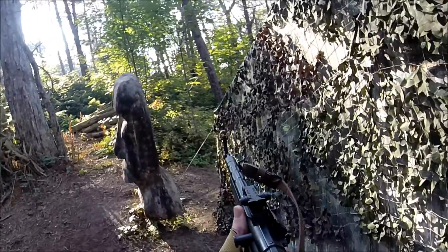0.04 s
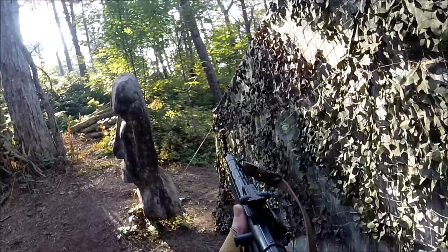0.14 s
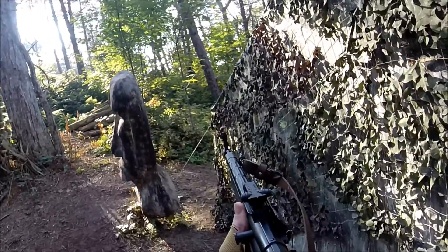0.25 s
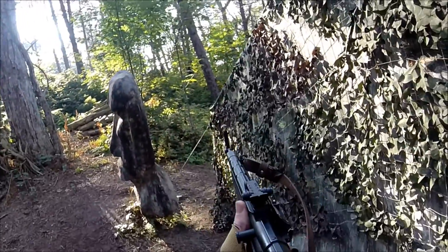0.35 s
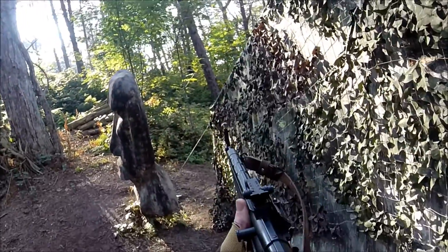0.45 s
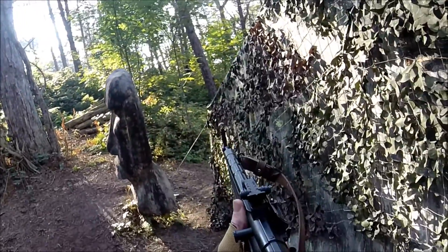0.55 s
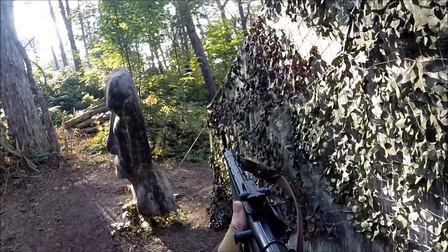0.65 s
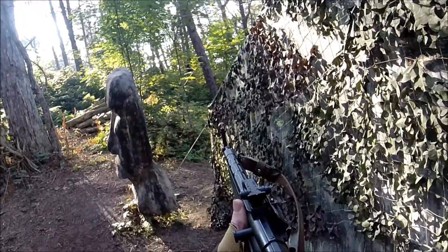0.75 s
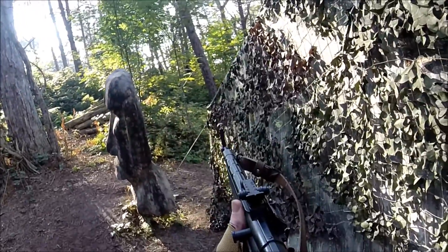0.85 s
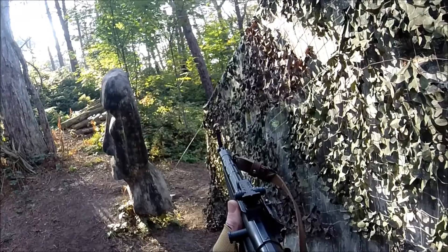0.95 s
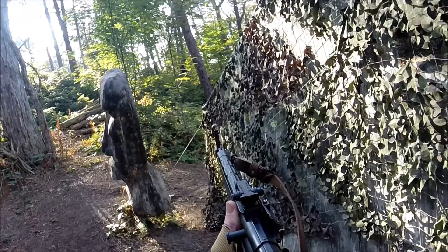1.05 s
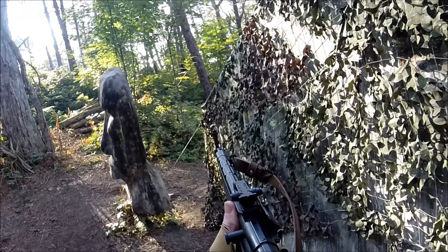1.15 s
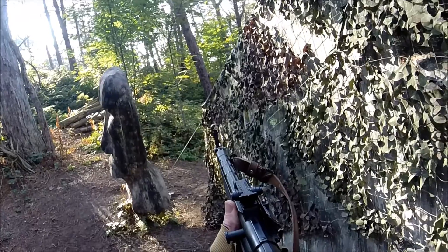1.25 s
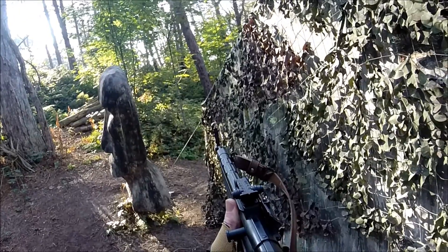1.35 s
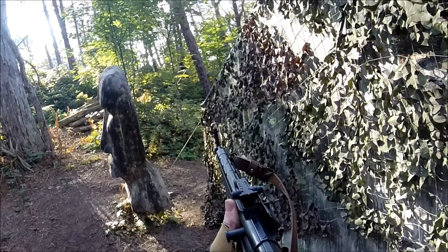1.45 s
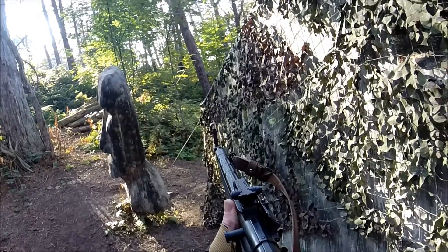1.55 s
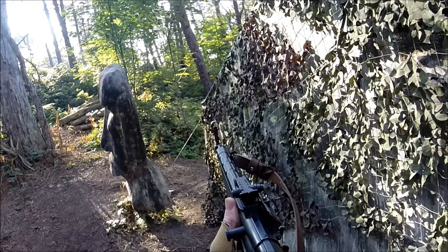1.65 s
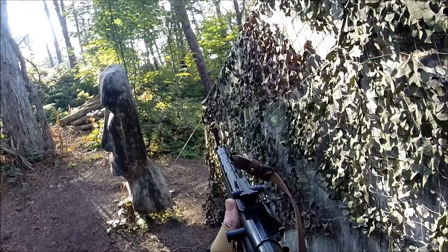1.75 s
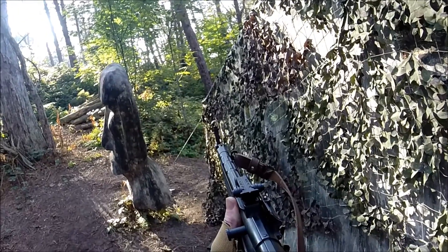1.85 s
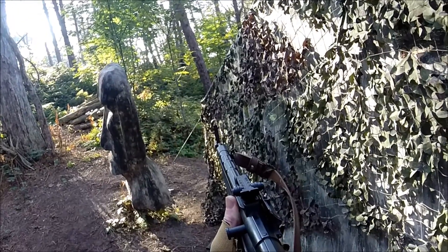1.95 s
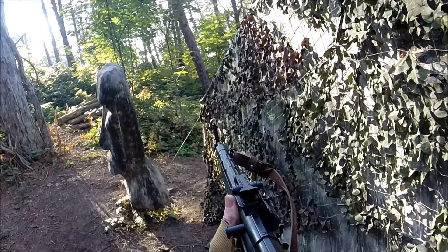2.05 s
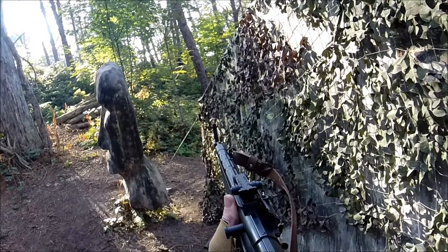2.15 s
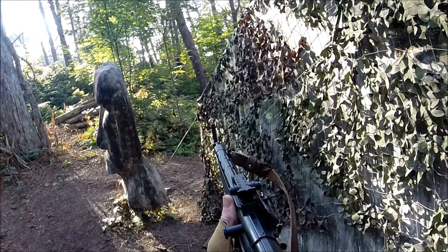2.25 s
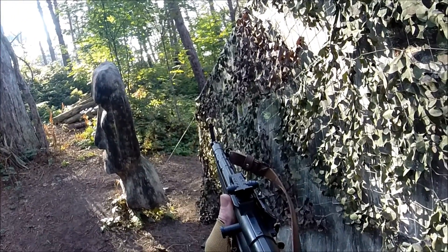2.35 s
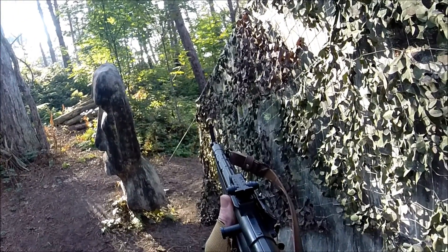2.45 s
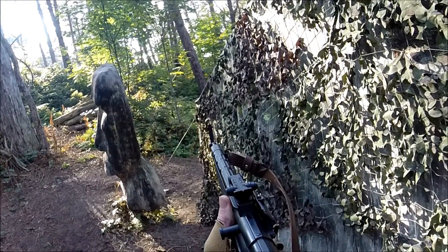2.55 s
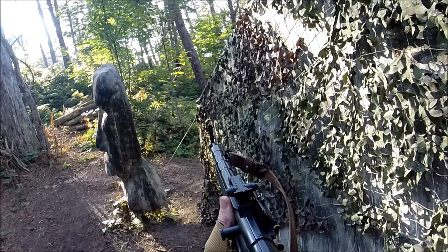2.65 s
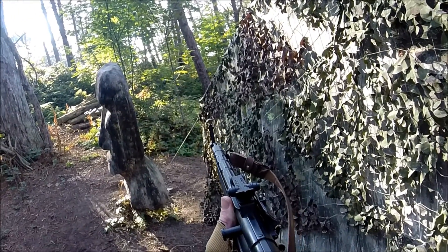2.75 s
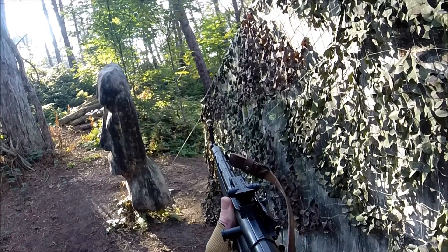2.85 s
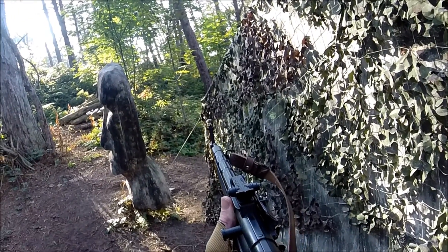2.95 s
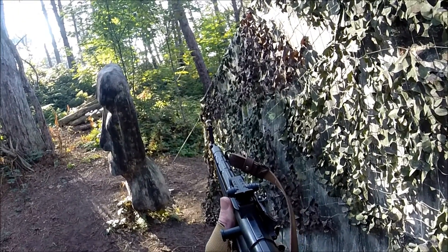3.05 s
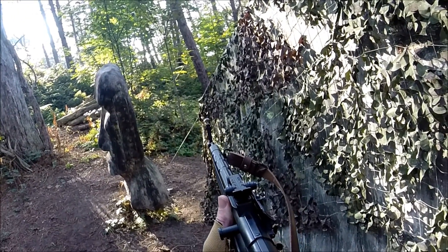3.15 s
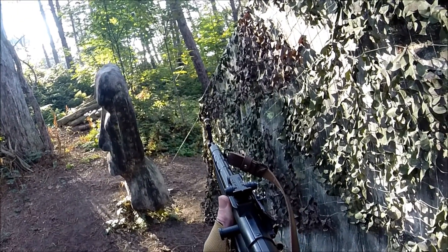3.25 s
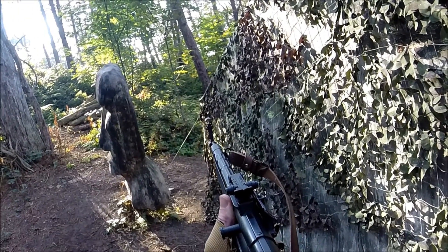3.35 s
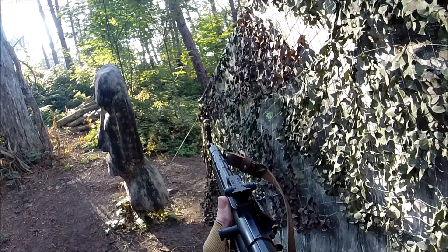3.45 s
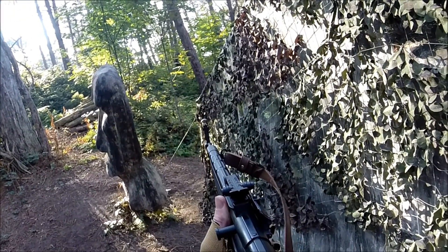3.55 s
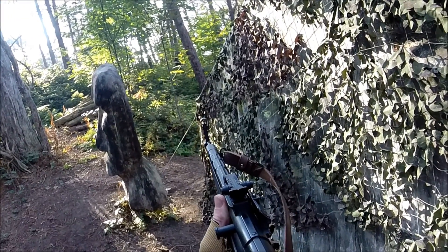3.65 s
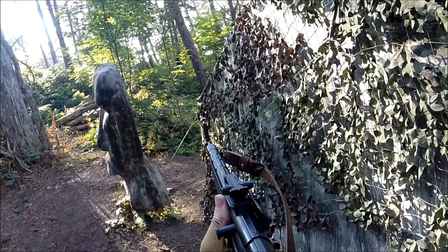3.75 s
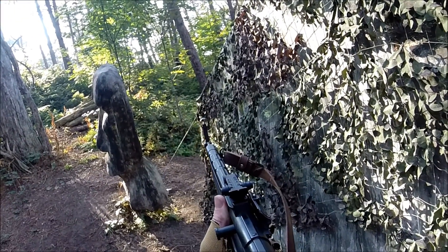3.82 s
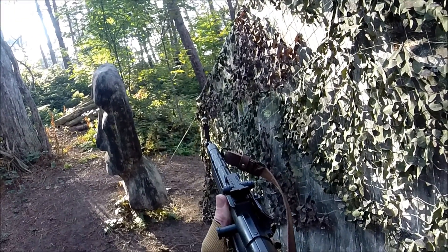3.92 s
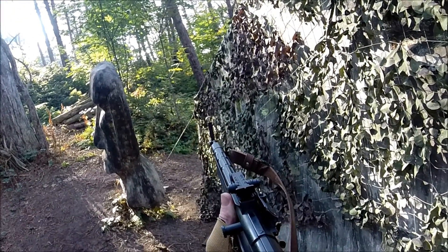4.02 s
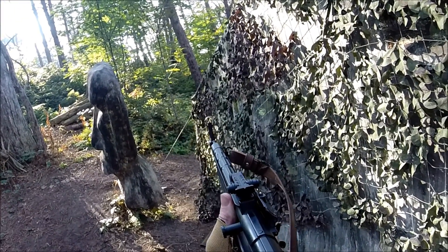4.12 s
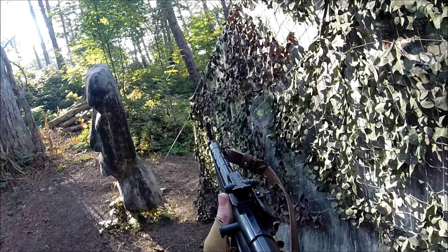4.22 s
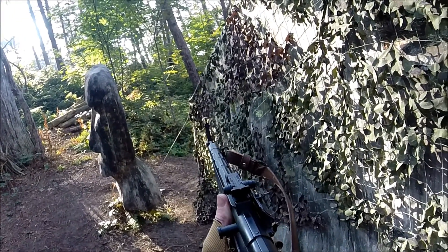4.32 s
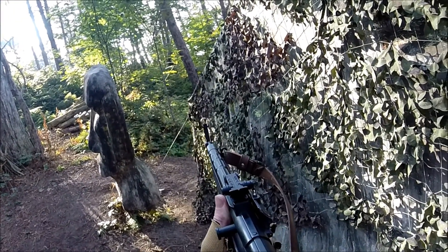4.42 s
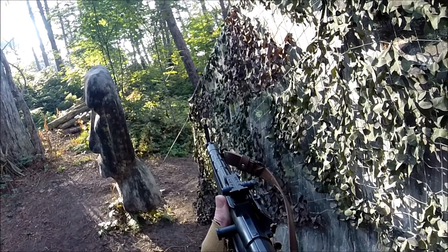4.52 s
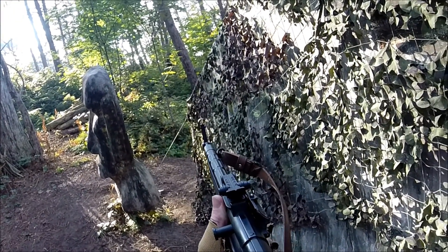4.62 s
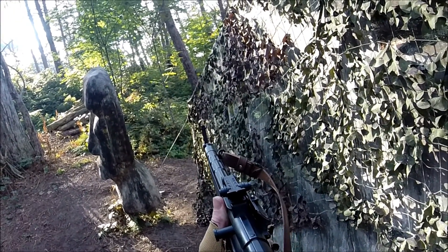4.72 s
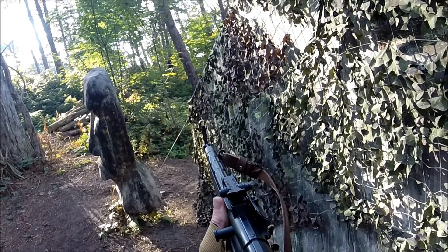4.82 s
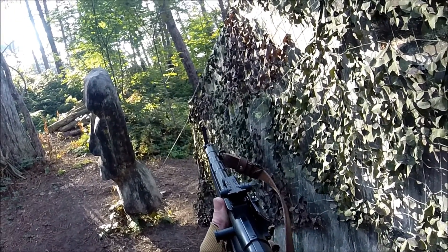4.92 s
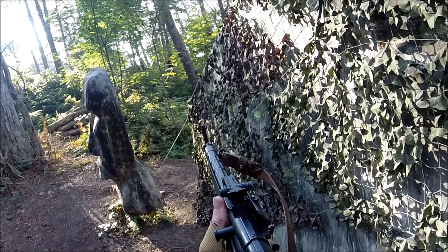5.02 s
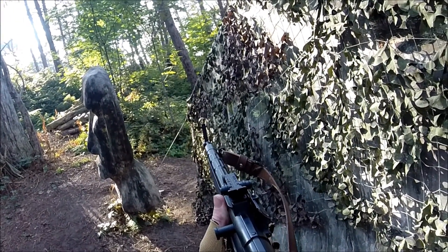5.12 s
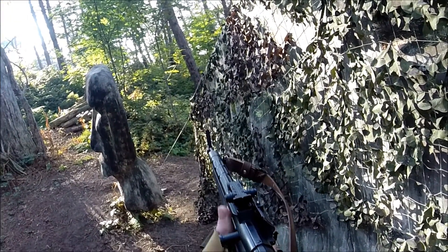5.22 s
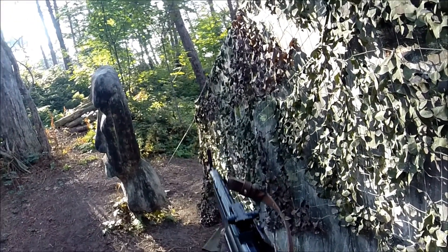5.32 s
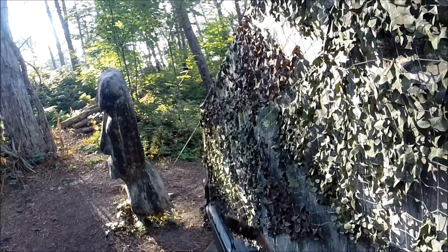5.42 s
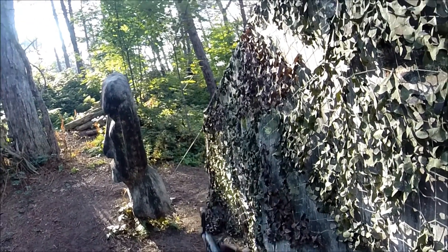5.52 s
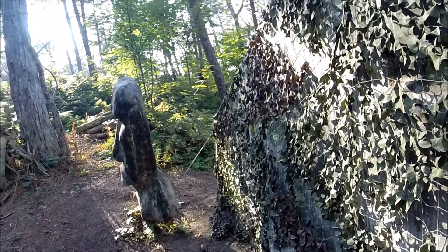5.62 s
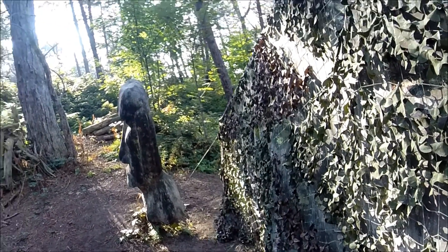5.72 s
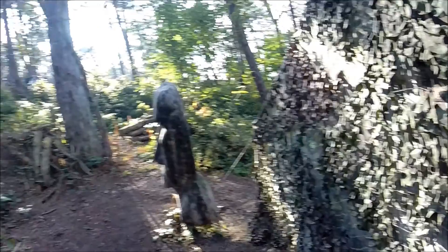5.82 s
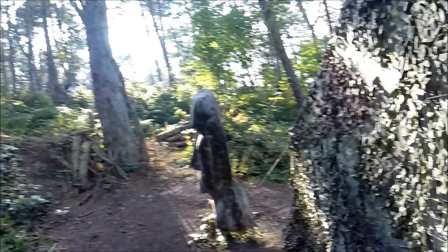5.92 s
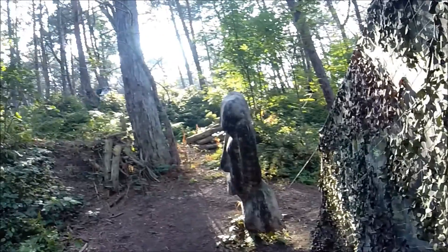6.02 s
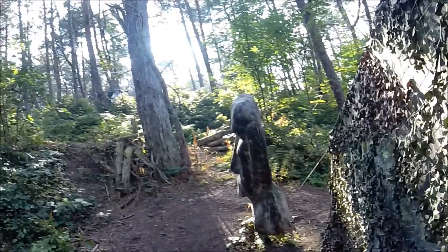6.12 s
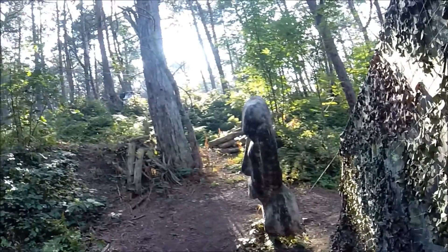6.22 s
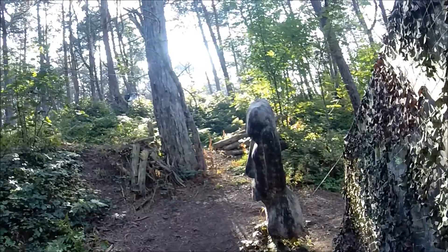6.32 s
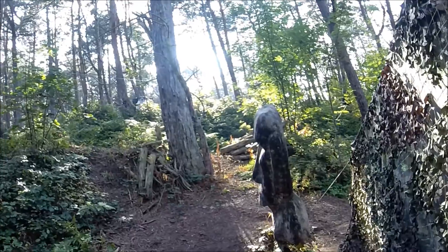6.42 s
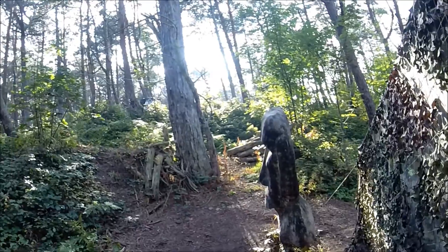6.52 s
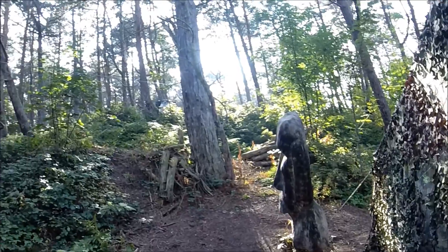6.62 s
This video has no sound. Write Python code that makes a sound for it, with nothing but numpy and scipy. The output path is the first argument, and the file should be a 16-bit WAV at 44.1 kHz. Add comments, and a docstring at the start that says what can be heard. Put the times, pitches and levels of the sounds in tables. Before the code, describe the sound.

An electric spring-piston toy rifle fires one long rapid burst, then two shorter ones, in quiet woodland, followed by loose handling knocks.

```python
"""Woodland air and a rustle of cloth are heard first, as filtered noise, then an electric spring-piston toy rifle
fires three bursts among trees. Gears grind the piston back, as random tooth contacts and a harmonic whine.
They let it go with a rattle and a thump; the air pops from the barrel, the tube rings and the gear catches
the piston again, impulses exciting damped resonators. Afterwards the gun and its strap knock about."""
import sys
import numpy as np
from scipy import signal
from scipy.fft import rfft, irfft
from scipy.io import wavfile

SR = 44100
rng = np.random.default_rng(int(sys.argv[2]) if len(sys.argv) > 2 else 0)


def to_wav(s):
    """Save 16-bit WAV."""
    ch = np.atleast_2d(s).T  # columns
    pcm = np.round(np.clip(ch, -1, 1) * 32767)  # PCM
    wavfile.write(sys.argv[1], SR, pcm.astype(np.int16))


def volts_from_db(level):
    """Convert decibel levels to linear amplitude ratios."""
    exponent = np.asarray(level, float) / 20
    return 10 ** exponent


N = 294069

# woodland air and cloth rustle: (time [s], air level [dB], rustle level [dB])
AIR_AND_RUSTLE = [(0, -49.5, -49.5), (.16, -52, -50), (2.8, -54.5, -57), (4.2, -55.5, -56), (4.9, -62, -58),
                  (5.3, -67, -57), (5.55, -64, -60.5), (5.8, -57, -54.5), (6.0, -56.5, -57),
                  (6.1, -53, -51), (6.3, -50, -48.5), (6.5, -52, -52.5), (6.58, -54, -39.5),
                  (6.67, -50, -56)]
# spectral shape of the air noise: (frequency [Hz], relative density [dB])
AIR_COLOUR = [(15, -27), (25, -4), (53, -3), (163, -12.5), (363, -13), (621, -17), (952, -36.5),
              (1810, -51), (3350, -78), (6540, -66), (15000, -73)]
# spectral shape of the rustle noise: (frequency [Hz], relative density [dB])
RUSTLE_COLOUR = [(200, -60), (440, -6), (1000, -3.3), (1400, -7), (1900, -11.5), (2200, -16), (2700, -16),
                 (3350, -8.5), (4000, -17), (5000, -16.5), (6400, -16.5), (8200, -26), (10500, -30),
                 (15000, -61)]
# gun and strap knocks: (time [s], level [dB], treble against it [dB], decay time T60 of the shaking [s])
KNOCKS = [(5.476, -47.5, -10, .06), (5.734, -33, 0.5, 0.037), (5.888, -27.5, -31, .076),
          (5.913, -30, -25, 0.043), (5.99, -47, -2, 0.053), (6.008, -32.5, -37, .045),
          (6.082, -46, -12.5, 0.054), (6.146, -29, -12, 0.075), (6.155, -23, -36, 0.036),
          (6.186, -23.5, -34, 0.049), (6.199, -34, -16, 0.06), (6.282, -44, 1.5, .047),
          (6.361, -26.5, -6.5, .11), (6.404, -24, -16, 0.046), (6.522, -20.5, -7.5, 0.078),
          (6.565, -35, 0.5, 0.2), (6.612, -22.5, -22, 0.028)]
# gun body resonances: (frequency [Hz], width [Hz], level when ground [dB], on release [dB], on the slam [dB])
BODY_MODES = [(308, 140, -51, -3, -9), (553, 285, -14, 0.5, -17), (763, 44, 1, 4.5, -15),
              (903, 145, -1.43, -17, -17), (1150, 273, -5, -2.5, -3.5), (1485, 206, -12, -8, -11.5),
              (2136, 199, -15, -6, 0.5), (3025, 465, -14.5, -5.5, -2), (3413, 405, -10.5, -11, -0.5),
              (4360, 244, -13, -9, 2), (5435, 900, -17.5, -12.5, -5.5), (6450, 990, -15.5, -8.5, -5.5),
              (7690, 1460, -25, -24.5, -9.5), (10250, 700, -30, -30, -18), (12600, 800, -36, -38, -30)]
# gear latch at start and stop: (time [s], rattle level [dB])
LATCH = [(0.166, -10), (2.781, -4), (2.801, -17), (2.814, -27), (3.082, -29), (4.099, -15.5), (4.299, -32)]
# trigger pulls: (time [s], strain against the resting spring [dB], top speed [turns/s], time to reach it [ms])
PULLS = [(.165, 8.5, 294, 68), (3.082, 2.5, 258, 32), (4.294, 7, 308, 66)]
# course of the strain: (time after the pull [ms], share of the strain [1])
STRAIN = [(0, .1), (19, -.5), (30, .9), (66, .65), (85, .3), (120, .3)]
# motor stops: (power off [s], gears halt [s], level lost by the halt [dB])
STOPS = [(2.736, 2.761, 17), (4.009, 4.112, 12.5), (5.286, 5.325, 6)]
# load through one gear turn: (time after the pop [ms], grinding level [dB])
TURN_LOAD = [(0, 14), (14, 0.5), (22, -4), (28, -2.5), (45, 3), (62, 1.2), (80, 2), (95, 3.5), (130, 14.5)]
# motor and gear whine: (multiple of the motor speed [1], relative level [dB])
WHINE = [(2, -3), (3, -4), (4, -8), (5, -14), (6, -1), (8, -3), (10, -8)]
# shots with a pellet: (time [s], pop level [dB], force of the piston stroke [dB])
PELLET_SHOTS = [(.2666, -1.2, -19), (.3718, -3.5, -21), (.4732, -4.4, -20.5), (.5744, -3.8, -19.5),
                (.676, -3.6, -19.7), (.7781, -4.1, -19.7), (.8816, -3.1, -19.2), (.9855, -3.2, -21.4),
                (1.089, -3.7, -21.5), (1.1929, -5, -22.1), (1.2968, -5, -21.4), (1.4016, -3.5, -20.3),
                (1.506, -4.8, -19.9), (1.6105, -4.1, -20.6), (1.7154, -3.3, -19.9), (1.82, -3.6, -19.6),
                (1.925, -3, -19), (2.0288, -8.4, -23.6), (2.1352, -6.6, -23.6), (2.2408, -5.3, -21.9),
                (2.3466, -4.5, -20.9), (2.4526, -4.5, -20.3), (2.5585, -4.2, -20.4), (2.6649, -3.7, -19.7),
                (3.1486, -2.2, -18.7), (3.2623, -3.9, -18.2), (3.3689, -3.9, -19.8), (3.4754, -3.8, -20.4),
                (3.5819, -4.4, -20.4), (3.6886, -4.3, -20.4), (3.7954, -3.7, -20.1), (3.9021, -3.5, -20.3),
                (4.009, -3.6, -20.3), (4.414, -2.7, -15.2), (4.5244, -3.3, -20.2), (4.6316, -4.1, -20.3),
                (4.7386, -3.9, -20.4), (4.8461, -4.3, -21), (5.1712, -11.9, -28.7)]
# shots from an empty barrel: (time [s], pop level [dB], force of the piston stroke [dB])
EMPTY_SHOTS = [(4.9509, -2.4, -26.9), (5.0599, -4, -26), (5.2823, -3.3, -28)]
# air in barrel and cylinder, with a pellet: (frequency [Hz], level [dB], T60 [s], delay after the shot time [ms])
LOADED_TUBE = [(838, -6.5, .05, 4.25), (419, -19, .035, 3.95), (1250, -8, .014, 1.25)]
# air in barrel and cylinder, empty: (frequency [Hz], level [dB], T60 [s], delay after the shot time [ms])
EMPTY_TUBE = [(1010, -1, 0.023, 2.92), (781, -9.5, 0.017, 5.56), (330, -7.5, 0.021, 0.86)]

TREES_T60_S, TREES_DB = .053, -20.5
KNOCK_HZ, KNOCK_SPREAD = 1080, .055   # hollow ring of the shell, a little different wherever it is struck
KNOCK_OVERTONE, KNOCK_OVERTONE_DB = 1.84, -7   # second ring of the shell (multiple of the first), shorter
KNOCK_LOW_DB, KNOCK_HIGH_DB, KNOCK_RING_DB, KNOCK_TICK_DB = 9.5, 15.5, -2.5, 9   # shares of each knock
JOLT_DB, JOLT_T60_S = -15, .04   # the motor jerks the gears into mesh at each pull

# grinding swells and sinks with the force of the strokes
GRIND_DB, USUAL_FORCE_DB, GRIND_FOLLOWS, FORCE_MOST_DB = -29.5, -18.5, .98, -.5
# freed by the shot the motor speeds up, then the tightening spring slows it (turns per second)
SHOT_TURNS, FREE_TURNS, LOADED_TURNS = 250, 357, 200
FREE_MS, SAG_TURNS_PER_MS = 24, 1.7
STALL_TURNS, PAST_TOP = 155, 1.27   # after a pull, speed rises as a quarter wave and sags a little
FOURTH_SHARE, THROB_HZ, THROB_PEAK_MS, THROB_DB = 1.6, 59, 30.5, 4.5   # fourth multiple follows strain, throbs
CUT_DB, CUT_S, HALT_DB_PER_MS = 7, .014, 1.2   # the grind drops as the power goes, then dies at the halt
KICK_S, KICK_DB, KICK_T60_S = 2.777, -25.5, .089   # the spring drives the gears back once

# the piston is let go before the pop; a pellet holds the air back longer, most on the first shot of a burst
STROKE_MS, FIRST_STROKE_MS, EMPTY_STROKE_MS, STROKE_SPREAD_MS = 11.4, 12.1, 8.1, .3
CATCH_MS, CATCH_DRIFT_MS_PER_S = 25.6, .55   # gear catch after the shot, later as time goes on
JUMPS_OVER_FORCE_DB, JUMP_RISE_MS, JUMP_T60_S = (19, 14), .2, .02   # rattle of the two jumps on release
RATTLE_CUT_HZ = 10150   # the shell swallows the top of each rattle
STOCK_HZ, STOCK_T60_S, STOCK_UNDER_FORCE_DB = 306, .065, 7   # the stock knocks as the piston slips free
STOCK_LEAD_MS, THUMP_LEAD_MS = .6, 5.3   # before the release, before the shot time
THUMP_HZ, THUMP_WIDTH_MS, THUMP_OVER_FORCE_DB = 127, 3.3, 1.5
CRACK_CUT_HZ = 13300
POP_MS = .26


def clicks(s, db):
    """Impulse excitation: one sample at each time, of the given level."""
    out = np.full(N, 1e-18)
    np.add.at(out, np.round(np.asarray(s) * SR).astype(int), volts_from_db(db))
    return out


def ring(x, hz, t60):
    """Damped free oscillation: a unit impulse starts a decaying sine of initial height 1."""
    r, w = volts_from_db(-60 / (t60 * SR)), 2 * np.pi * hz / SR
    return signal.lfilter([0, np.sin(w)], [1, -2 * r * np.cos(w), r * r], x)


def dying(x, rise_ms, t60):
    """Exponential build-up and decay: each impulse becomes an envelope that rises fast and dies away."""
    up, down = np.exp(-1000 / (rise_ms * SR)), volts_from_db(-60 / (t60 * SR))
    decaying = signal.lfilter([1], [1, -down], x)
    return signal.lfilter([1 - up], [1, -up], decaying)


def rms_one(x):
    """Power normalisation: scales a signal to unit rms."""
    return x / np.sqrt(np.mean(x ** 2) + 1e-20)


def grit(per_s, spread_db):
    """Shot noise: random contacts of uneven size and either sign, at unit rms."""
    sizes = volts_from_db(spread_db * np.minimum(rng.exponential(1, N), 5)) * rng.choice([-1, 1], N)
    return rms_one(sizes * (rng.random(N) < per_s / SR))


def coloured(points):
    """Spectral shaping: white noise filtered to a given density, at unit rms."""
    hz, db = np.transpose(points)
    grid = np.maximum(np.fft.rfftfreq(N, 1 / SR), 1)
    gain = volts_from_db(np.interp(np.log(grid), np.log(hz), db))
    return rms_one(irfft(rfft(rng.standard_normal(N)) * gain, N))


def flicker(rate, depth_db):
    """Random amplitude modulation: a gain that wanders between rate knots per second."""
    knots = rng.standard_normal(1200)
    return volts_from_db(depth_db * np.interp(np.arange(N) / SR * rate, np.arange(1200), knots))


def background():
    """Broadband noise: woodland air and cloth rustle, each of its own spectrum and slowly varying level."""
    s, air_db, rustle_db = np.transpose(AIR_AND_RUSTLE)
    t = np.arange(N) / SR
    air = volts_from_db(np.interp(t, s, air_db)) * coloured(AIR_COLOUR) * flicker(15, depth_db=1.5)
    rustle = volts_from_db(np.interp(t, s, rustle_db)) * coloured(RUSTLE_COLOUR) * flicker(40, depth_db=1)
    return air + rustle


def trees(x):
    """Diffuse scattering: convolution with decaying noise gives dull echoes from trunks and netting."""
    t = np.arange(SR // 2) / SR
    scatter = rng.standard_normal(len(t)) * volts_from_db(-60 * t / TREES_T60_S) * (t > .008)
    scatter = signal.lfilter([.4], [1, -.6], scatter)
    return signal.fftconvolve(x, scatter / np.sqrt(np.sum(scatter ** 2)))[:N]


def knocks():
    """Impact excitation: each knock ticks, shakes the body low and high and rings the hollow shell."""
    low, high, shell = np.zeros((3, N))
    for at, db, treble_db, t60 in KNOCKS:
        hz = KNOCK_HZ * (1 + KNOCK_SPREAD * rng.standard_normal())
        low += dying(clicks([at], db + KNOCK_LOW_DB), .095, t60)
        high += dying(clicks([at], db + treble_db + KNOCK_HIGH_DB), .12, t60)
        shell += ring(clicks([at + .00076], db + KNOCK_RING_DB), hz, .5 * t60)
        shell += ring(clicks([at], db + KNOCK_OVERTONE_DB), KNOCK_OVERTONE * hz, .35 * t60)
    s, db = np.transpose(KNOCKS)[:2]
    ticks = clicks(s, db + KNOCK_TICK_DB)
    return low * grit(6000, spread_db=6), high * grit(4000, spread_db=3) + ticks, shell


def body(ground, released, slammed, treble):
    """Modal superposition: all shaking rings the same resonances; treble shakes only the upper ones."""
    out = 0
    for k, (hz, width, *db) in enumerate(BODY_MODES):
        r, w = np.exp(-np.pi * width / SR), 2 * np.pi * hz / SR
        drive = volts_from_db(db) @ [ground, released + treble * (hz > 2000), slammed]
        mode = signal.lfilter([(1 - r * r) / 2, 0, (r * r - 1) / 2], [1, -2 * r * np.cos(w), r * r], drive)
        out = out + (-1) ** k * mode   # neighbours in opposite phase
    return out


def motor_level(pops, force_db):
    """Load-dependent drive: level and speed follow trigger, stroke force and the load through each turn."""
    t = np.arange(N) / SR
    last = np.maximum(np.searchsorted(pops, t) - 1, 0)
    since_ms = 1000 * (t - pops[last])
    follow_db = np.minimum(GRIND_FOLLOWS * (force_db[last] - USUAL_FORCE_DB), FORCE_MOST_DB)
    db = follow_db + np.interp(since_ms, *np.transpose(TURN_LOAD))
    rising = FREE_TURNS - (FREE_TURNS - SHOT_TURNS) * (1 - since_ms / FREE_MS) ** 2
    sagging = FREE_TURNS - SAG_TURNS_PER_MS * (since_ms - FREE_MS)
    turns = np.maximum(np.where(since_ms < FREE_MS, rising, sagging), LOADED_TURNS)
    fourth_db = np.zeros(N)
    level = volts_from_db(KICK_DB - 60 * np.abs(t - KICK_S) / KICK_T60_S) * (t > KICK_S)
    for (pull, strain_db, top_turns, top_ms), (off, halt, coast_db) in zip(PULLS, STOPS):
        on = (t >= pull) & (t < pops[pops > pull][0])   # from the pull to the first pop
        ms = 1000 * (t[on] - pull)
        db[on] = strain_db * np.interp(ms, *np.transpose(STRAIN))
        quarter_wave = np.sin(np.pi / 2 * np.minimum(ms / top_ms, PAST_TOP))
        turns[on] = STALL_TURNS + (top_turns - STALL_TURNS) * quarter_wave
        throb = np.cos(2 * np.pi * THROB_HZ * (ms - THROB_PEAK_MS) / 1000)
        fourth_db[on] = FOURTH_SHARE * db[on] + THROB_DB * throb
        end = halt + .1
        lost_db = np.interp(t, [off, off + CUT_S, halt, end],
                            [0, CUT_DB, coast_db, coast_db + 100 * HALT_DB_PER_MS])
        level = level + volts_from_db(GRIND_DB + db - lost_db) * (t >= pull) * (t < end)
    return level, turns, fourth_db


def whine(turns, fourth_db):
    """Harmonic series: armature and teeth sing at multiples of the speed; spin-up favours the fourth."""
    angle = 2 * np.pi * np.cumsum(turns * flicker(150, depth_db=.19)) / SR
    out = 0
    for k, db in WHINE:
        share = 1 if k == 4 else -.5 * (k > 4)
        out = out + volts_from_db(db + fourth_db * share) * flicker(90, depth_db=3.3) * np.sin(k * angle)
    return out


def grinding(motor, turns, fourth_db):
    """Contact noise with a harmonic tone: tooth contacts and whine share the motor's level."""
    teeth = volts_from_db(17) * grit(2000, spread_db=2) * flicker(57, depth_db=1)
    return motor * (teeth + volts_from_db(8.5) * whine(turns, fourth_db))


def release_rattle(let_go, force_db):
    """Repeated impact: the piston jumps twice as it is let go."""
    first_db, second_db = force_db + np.array(JUMPS_OVER_FORCE_DB)[:, None]
    jumps = clicks(let_go, first_db) + clicks(let_go + .00247, second_db)
    return dying(jumps, JUMP_RISE_MS, JUMP_T60_S)


def stock_knock(let_go, force_db):
    """Free vibration: the stock rings at one frequency as the piston slips free."""
    struck = clicks(let_go - STOCK_LEAD_MS / 1000, force_db - STOCK_UNDER_FORCE_DB)
    return ring(struck, STOCK_HZ, STOCK_T60_S)


def thump(s, force_db):
    """Recoil: the piston's rush shakes the whole gun for about a cycle and a half."""
    t = np.arange(-600, 601) / SR
    bell = np.exp(-((t * 1000 - 1) / THUMP_WIDTH_MS) ** 2 / 2)
    shake = -np.cos(2 * np.pi * THUMP_HZ * t) * bell
    return signal.fftconvolve(clicks(s - THUMP_LEAD_MS / 1000, force_db + THUMP_OVER_FORCE_DB), shake, "same")


def piston_crack(s, pop_db):
    """Hard impact: the piston head meets the cylinder end and gives a brief high ring."""
    crack = ring(clicks(s + .00085, pop_db - 6), 8190, .0014)
    return signal.sosfilt(signal.butter(4, CRACK_CUT_HZ, fs=SR, output="sos"), crack)


def air_pop(s, db, empty):
    """Pulse radiation and tube resonance: suction then pressure at the muzzle, then the returning wave rings."""
    u = np.arange(-60, 61) / (POP_MS * SR / 1000)
    pulse = u * np.exp(.5 - u * u / 2)
    out = np.convolve(clicks(s + POP_MS / 1000, db), pulse, "same")
    # a small muzzle radiates little bass
    out = signal.sosfilt(signal.butter(1, 220, "high", fs=SR, output="sos"), out)
    for modes, these in ((LOADED_TUBE, empty < .5), (EMPTY_TUBE, empty >= .5)):
        for hz, level_db, t60, lag_ms in modes:
            strength_db = db + level_db + rng.normal(0, .16, len(s))
            out += ring(clicks(s[these] + lag_ms / 1000, strength_db[these]), hz, t60)
    return out


def all_shots():
    """Event superposition: both kinds of shot in time order, as s, pop dB, force dB, empty 0-1."""
    rows = np.array([(*row, 0) for row in PELLET_SHOTS] + [(*row, 1) for row in EMPTY_SHOTS])
    return rows[np.argsort(rows[:, 0])].T


def rifle():
    """Source and resonator: gears, release, slam, catch and knocks shake the body; pop and thump add to it."""
    s, pop_db, force_db, empty = all_shots()
    first = np.diff(s, prepend=0) > .2
    lead_ms = np.where(empty, EMPTY_STROKE_MS, np.where(first, FIRST_STROKE_MS, STROKE_MS))
    lead_ms = lead_ms + STROKE_SPREAD_MS * rng.standard_normal(len(s))
    let_go = s - lead_ms / 1000
    caught = s + (CATCH_MS + CATCH_DRIFT_MS_PER_S * s) / 1000
    motor, turns, fourth_db = motor_level(s, force_db)
    ground = grinding(motor, turns, fourth_db)
    catch = dying(clicks(caught, 28.95) * motor, .67, .062)
    feed = dying(clicks(caught + .015, 12.6) * motor, 1.5, .074)   # the nozzle slides back with a thin scrape
    latch_s, latch_db = np.transpose(LATCH)
    rattle = release_rattle(let_go, force_db) + dying(clicks(latch_s, latch_db), .15, .035)
    slam = dying(clicks(s + .00078, pop_db - .5), .074, .038)
    low, high, shell = knocks()
    jolts = clicks(np.transpose(PULLS)[0], JOLT_DB) + clicks(latch_s, latch_db - 7)
    low = low + dying(jolts, .24, JOLT_T60_S) * grit(6000, spread_db=-.5)
    dull = signal.butter(2, RATTLE_CUT_HZ, fs=SR, output="sos")
    shaken = body(ground + catch * grit(5400, spread_db=4.5) + low,
                  signal.sosfilt(dull, (rattle + .4 * catch) * grit(12000, spread_db=2)),
                  signal.sosfilt(dull, slam * grit(12000, spread_db=2)),
                  high + feed * grit(12000, spread_db=12))
    struck = piston_crack(s, pop_db) + shell + stock_knock(let_go, force_db)
    return shaken + struck + thump(s, force_db) + air_pop(s, pop_db, empty)


def scene():
    """Linear superposition: background, the rifle's direct sound and its echoes from the trees."""
    gun = rifle()
    return (background() + volts_from_db(TREES_DB) * trees(gun) + gun)[None]


def roll_off(x):
    """The treble ends steeply here."""
    return signal.sosfilt(signal.butter(12, 15960, fs=SR, output="sos"), x)


def record(dry):
    """Band limiting and soft saturation: the lowest bass and the top are cut and peaks are rounded."""
    dry = signal.sosfilt(signal.butter(2, 46, "high", fs=SR, output="sos"), dry)
    rounded = 2.5 * np.tanh(dry / 2.5)
    mix = signal.sosfilt(signal.cheby2(10, 50, 16000, fs=SR, output="sos"), rounded)
    return roll_off(mix)


dry = scene()
out = record(dry)
to_wav(out)
```